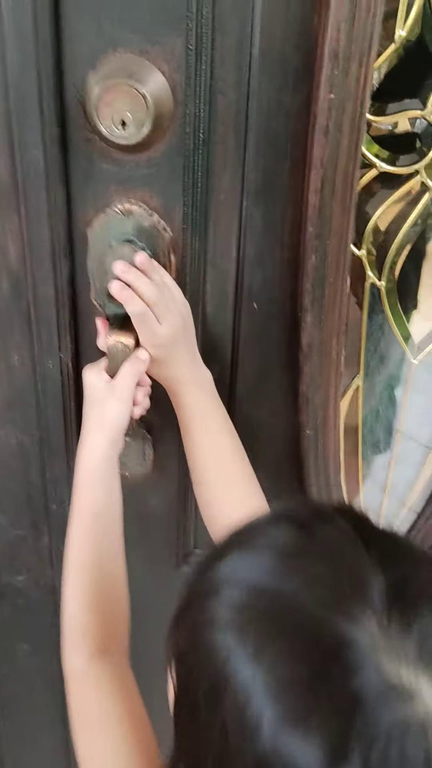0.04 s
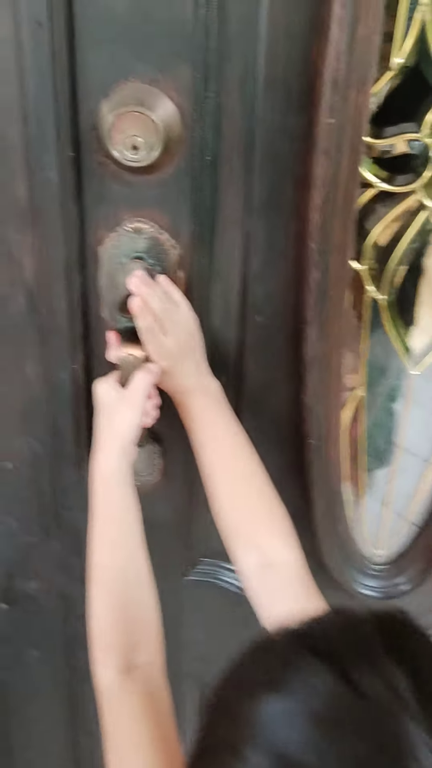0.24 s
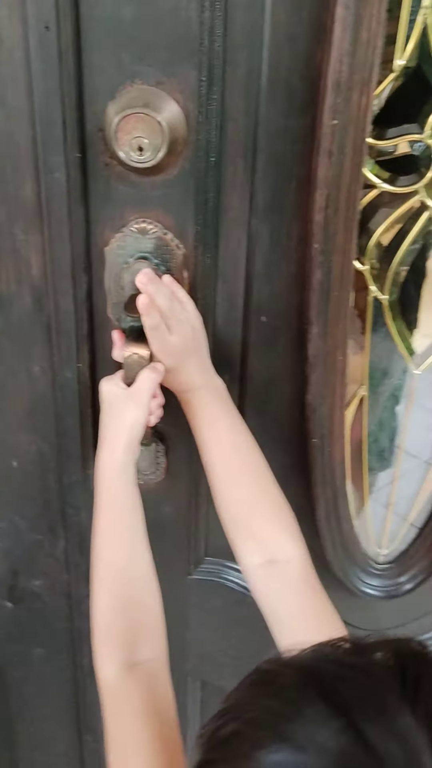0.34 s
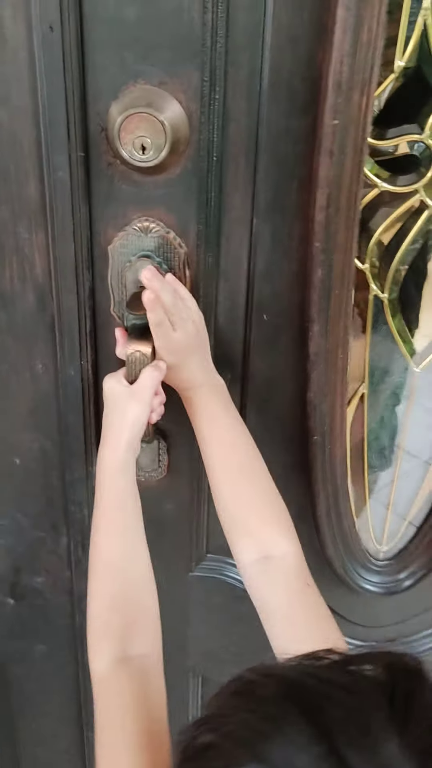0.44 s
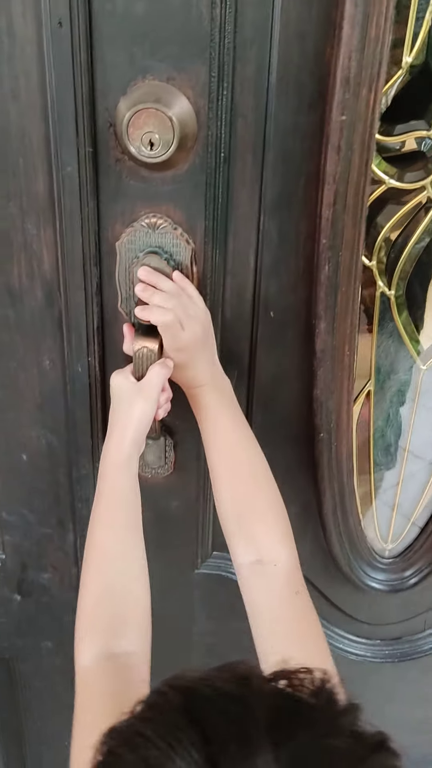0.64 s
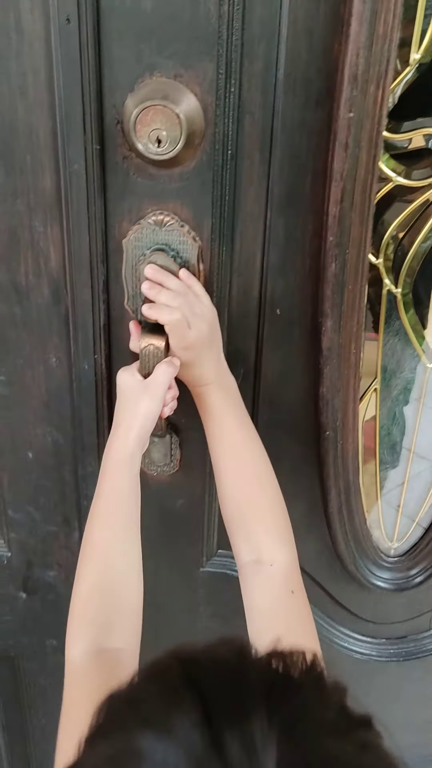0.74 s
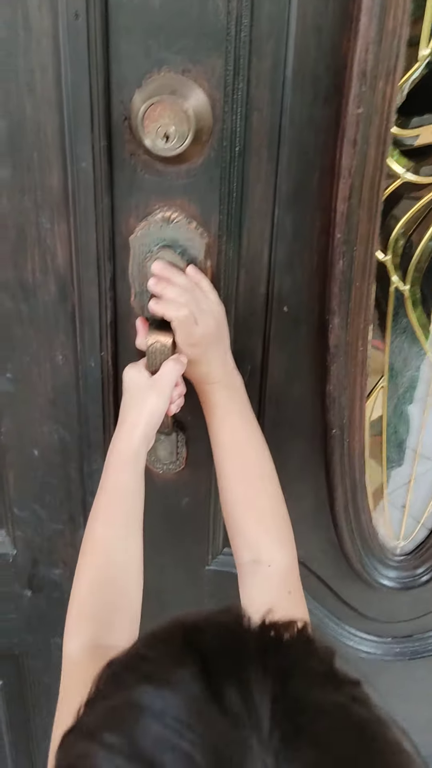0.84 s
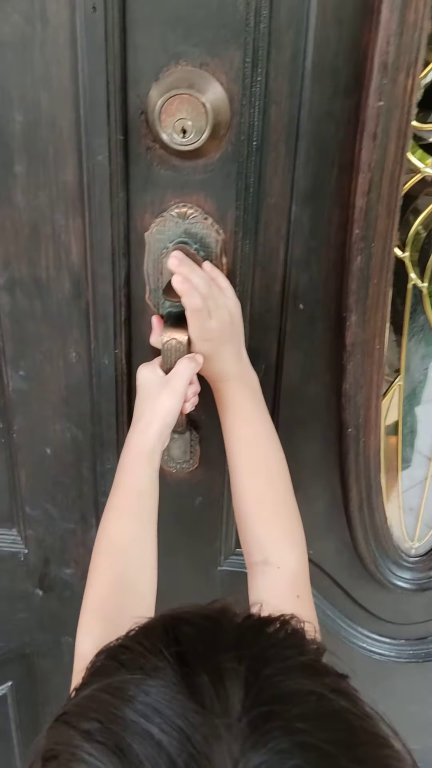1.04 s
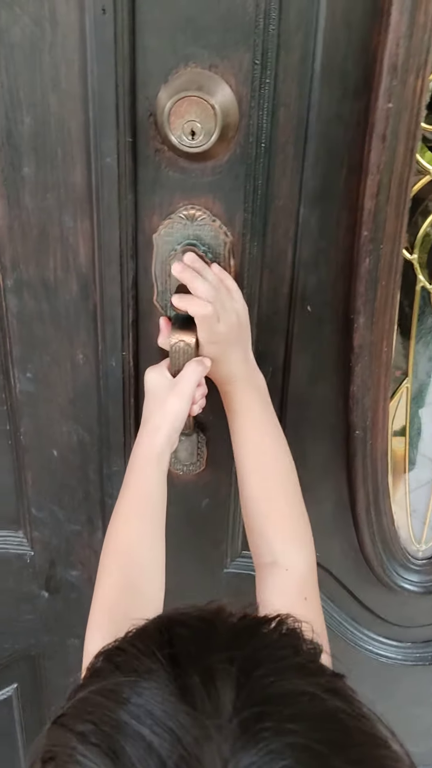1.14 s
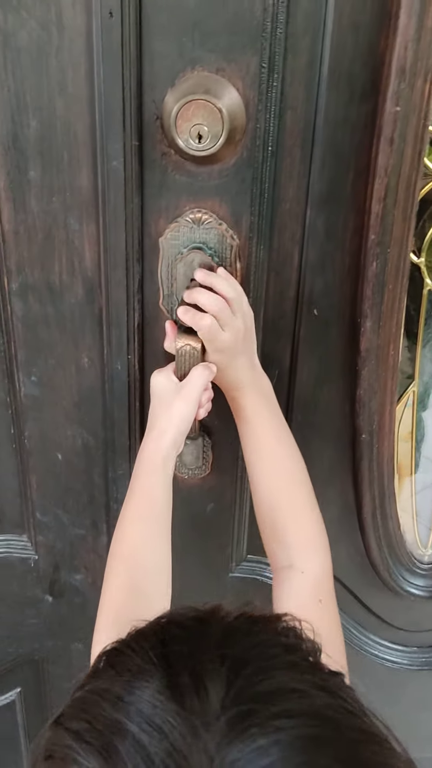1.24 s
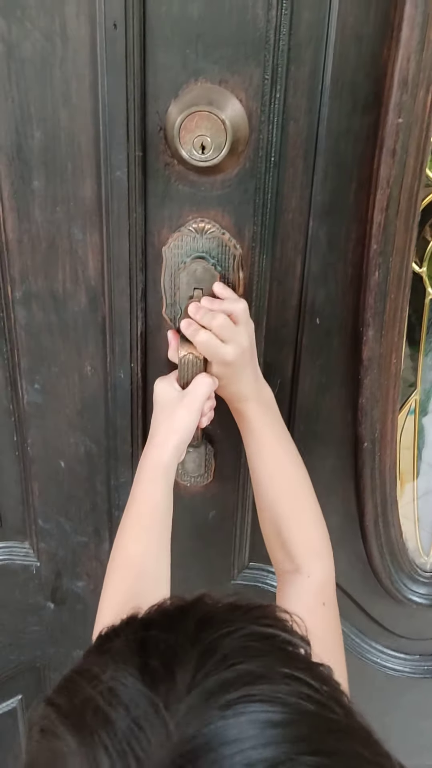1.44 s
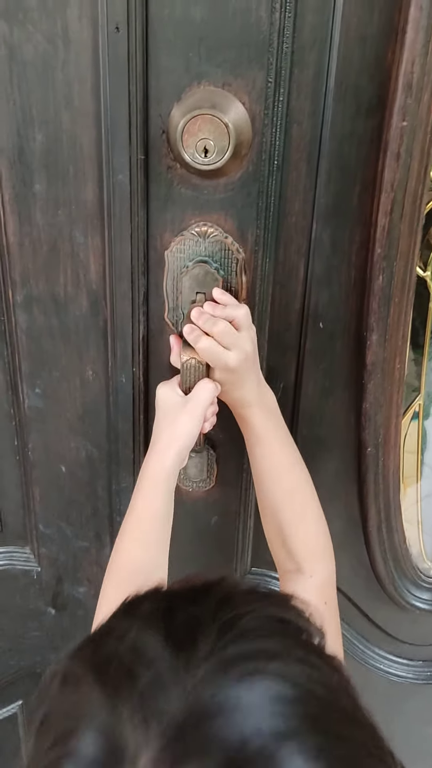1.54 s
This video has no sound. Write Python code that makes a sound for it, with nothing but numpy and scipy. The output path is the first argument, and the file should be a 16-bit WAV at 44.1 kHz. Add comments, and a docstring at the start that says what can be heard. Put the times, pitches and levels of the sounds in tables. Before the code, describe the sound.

Metal door latch clacking as a wooden door thuds, ending in one bright click.

```python
"""At a heavy wooden front door, close up: hands work the thumb latch.
The door thuds on its frame and its panel rings. Latch parts clack, scrape and ring the lock case.
After faint ticks and bumps the sprung bolt snaps home with one bright, bouncing click.
Behind it: low room rumble, a thin whistle and fine hiss."""
import sys
import numpy as np
from scipy import signal
from scipy.fft import rfft, irfft
from scipy.io import wavfile
from scipy.ndimage import uniform_filter1d

SR = 44100
rng = np.random.default_rng(int(sys.argv[2]) if len(sys.argv) > 2 else 0)


def pcm_store(signal):
    """Save signal as 16-bit PCM."""
    levels = np.round(np.clip(np.atleast_2d(signal), -1, 1) * 32767)
    wavfile.write(sys.argv[1], SR, levels.astype(np.int16).T)


N = 70560
T = np.arange(N) / SR
LEFT_LAG_S = 0.0004

# Latch clacks. Each row: start in seconds, bright level in dB, case level in dB, decay in seconds,
# left over right in dB.
LATCH_CLACKS = [(0.181, -42, -62, 0.0036, -7), (0.2081, -37, -24.5, 0.0081, 3),
                (0.2204, -14, -12, 0.0045, 4.5), (0.246, -17.5, -21.5, 0.011, 0),
                (0.256, -8, -18, 0.0038, 7), (0.2583, -7, -14.5, 0.0017, -3),
                (0.2666, -23, -19.5, 0.0051, -1), (0.294, -29, -25, 0.012, 18),
                (0.341, -21.5, -21.5, 0.017, 4), (0.351, -26, -31.5, 0.0064, -12),
                (0.354, -13, -22, 0.0092, 1.5), (0.4, -24, -28, 0.028, 1.5),
                (0.464, -19.5, -46, 0.0027, -6), (0.4649, -18.5, -30, 0.0052, -4),
                (0.51, -24.5, -26.5, 0.0081, -1.5), (0.521, -24, -30, 0.0022, 3),
                (0.565, -32, -33, 0.0068, 3), (0.6165, -22.5, -30.5, 0.0086, -3.5),
                (0.632, -36, -31, 0.0093, 13), (0.735, -28, -28, 0.0049, -9),
                (0.780, -49, -41.5, 0.025, -12), (0.831, -36.5, -36.5, 0.0049, -2)]
# Thumb piece ticks. Each row: start in seconds, level in dB.
THUMB_TICKS = [(0.948, -41), (0.961, -39), (0.967, -35.5), (0.991, -37.5), (1.038, -42.5), (1.206, -33.5),
               (1.211, -26), (1.218, -42), (1.244, -34)]
# Bolt landing and bounces. Each row: start in seconds, bright level in dB, case level in dB.
BOLT_HITS = [(1.4132, -31, -33), (1.4157, -7.5, -33), (1.4173, -9, -26.5), (1.4194, -6, -23),
             (1.4223, -13, -23.5), (1.4265, -17, -33.5)]
# Door on frame. Each row: centre in seconds, push in dB, Gaussian width in seconds, sign.
FRAME_PUSHES = [(0.2251, -15, 0.00062, -1), (0.2322, -11, 0.00088, 1), (0.2364, -4.5, 0.00043, -1),
                (0.2415, -7, 0.00079, 1), (0.2441, -13, .001, -1)]
# Hand bumps and door knocks. Each row: start in seconds, level in dB, decay in seconds.
HAND_BUMPS = [(0.434, -24.5, 0.035), (0.520, -25.5, 0.0088), (1.150, -33.5, 0.019), (1.171, -38.5, 0.044),
              (1.267, -34, 0.022), (1.302, -33, 0.012), (1.413, -49, 0.065)]
DOOR_KNOCKS = [(0.306, -26.5, 0.02), (0.356, -35, 0.0081), (0.508, -42, 0.005), (0.523, -21.5, 0.0064)]

# Ringing modes. Each row: frequency in Hz, relative level in dB, T60 in seconds.
LOCK_CASE_MODES = [(965, -28.5, 0.12), (1926, -21, 0.1), (2670, -17, 0.13), (3077, -5, 0.023),
                   (3240, -18.5, 0.023), (3830, -21, 0.043), (4526, -13, 0.084), (5812, -17, 0.073)]
BOLT_MODES = [(1012, -50, 0.35), (1209, -21, 0.058), (1373, -33, 0.055), (1680, -23.5, 0.041),
              (2060, -43, 0.063), (3200, -32, 0.063), (7843, -36, .04), (8300, -38, .04),
              (9350, -44, 0.035), (8960, -25, 0.035), (9100, -31, 0.033), (10200, -44, 0.041),
              (10665, -45, .045)]
DOOR_MODES = [(104.6, -32, 0.72), (179.9, -25.5, 0.66), (211, -35, .25), (285.4, -35, 0.78),
              (353.3, -23, 0.22), (438, -34.5, 1.0), (465, -26.5, 0.27), (570, -35, 0.39)]
# Shaken panel resonances. Each row: frequency in Hz, gain in dB, width in Hz.
PANEL_RESONANCES = [(106.4, -9, 36), (315.3, -10, 15.5), (378, -21.5, 6.7), (428, -9, 22.5)]

# Shaking. Each row: time in seconds, wood drive in dB, case drive in dB.
SHAKE_LEVELS = [(0, -43, -50), (.09, -53, -58), (.205, -47, -54), (.245, -27, -25.5), (.32, -37.5, -38.5),
                (.39, -33.5, -34), (.53, -37.5, -35.5), (.595, -40, -43.5), (.67, -42.5, -49),
                (.725, -43, -34), (.77, -47, -71), (.85, -51, -51), (.92, -54.5, -64.5),
                (1.18, -59.5, -68.5), (1.24, -58.5, -51.5), (1.38, -54, -79), (1.6, -57.5, -69)]
# Sliding metal. Each row: time in seconds, scrape level in dB, fizz level in dB.
SLIDE_LEVELS = [(0, -37, -39), (.035, -39.5, -53), (.10, -51.5, -72), (.21, -46.5, -73), (.26, -19, -53),
                (.325, -72, -60), (.42, -39.5, -64), (.53, -35.5, -47), (.605, -55, -52), (.64, -38.5, -37),
                (.665, -34, -40.5), (.73, -30.5, -34), (.77, -64, -59), (.87, -57, -59), (1.24, -56.5, -52),
                (1.6, -63, -82)]
# Thin whistle. Each row: time in seconds, level in dB.
WHISTLE_LEVELS = [(0, -75), (.98, -74), (1.12, -57), (1.2, -62), (1.28, -54), (1.40, -86), (1.6, -80)]
# Drifting hiss band. Each row: time in seconds, centre in Hz, level in dB.
HISS_TRACK = [(.75, 10000, -75), (.85, 11270, -57), (0.899, 11750, -55), (.98, 12300, -60),
              (1.2, 12400, -61), (1.312, 11900, -58.5), (1.40, 10030, -58), (1.482, 9110, -52.5),
              (1.58, 7540, -68.5)]

# Source spectra. Each row: frequency in Hz, relative density in dB.
CLACK_SPECTRUM = [(300, -39), (5000, -10.5), (6800, -8), (7700, 1.5), (8600, 7.5), (10200, -2.5),
                  (11800, -14.5), (14500, -36)]
CASE_SPECTRUM = [(100, -14), (450, -3.5), (1300, -5), (2100, -2), (2600, -3.5), (3080, -4), (3400, 1),
                 (3800, 0.5), (4900, -15), (5800, -6), (7500, -11.5), (14000, -40)]
SNAP_SPECTRUM = [(300, -50), (5000, -13.5), (7200, -14), (8000, -4.5), (9100, 1), (10000, -1.5),
                 (11000, -2), (11800, -9.5), (14000, -13)]
SNAP_CASE_SPECTRUM = [(100, -34), (260, -11), (520, -16), (850, -1), (1250, -2), (2000, -5.5), (2700, -3.5),
                      (3300, -0.5), (4800, -4), (7000, -18), (14000, -35)]
WOOD_SPECTRUM = [(20, -7.5), (55, -6.5), (80, -7.5), (105, 1), (135, -6), (175, -2.5), (240, -13.5),
                 (290, -2.5), (390, -26.5), (440, -11.5), (700, -19), (2000, -32)]
SCRAPE_SPECTRUM = [(300, -53), (4000, -15.5), (6500, -6.5), (8800, 0.5), (10200, 0), (12000, -14),
                   (14500, -13.5)]
FIZZ_SPECTRUM = [(300, -44), (8000, -14), (10500, 6), (12500, -5), (14200, -6)]
PALM_SPECTRUM = [(20, 0.5), (60, -0.5), (130, -2), (210, -11.5), (330, -29.5), (1000, -65)]
KNOCK_SPECTRUM = [(40, -24), (150, 6), (260, 6), (350, 8), (400, -18), (450, -13), (590, 1), (800, -18),
                  (2500, -25)]
RUMBLE_SPECTRUM = [(20, 3.5), (60, 4.5), (120, -2), (200, -14.5), (400, -15), (800, -15.5), (2000, -20),
                   (4500, -48.5), (14000, -66)]
HISS_SPECTRUM = [(3000, -21), (6000, -12), (8000, -16), (9400, 4.5), (10500, -17), (12000, -5),
                 (14000, -13)]

# Room decay. Each row: frequency in Hz, T60 in seconds.
ROOM_DECAY = [(100, 0.58), (500, 0.38), (2000, 0.31), (9000, 0.3), (14000, 0.35)]
# Microphone mismatch. Each row: frequency in Hz, left over right in dB before normalising.
MIC_BALANCE = [(30, -11), (100, -1), (350, 1.5), (700, 0.5), (1250, -2.5), (2300, -1.5), (4300, 1.5),
               (6000, -1.5), (7800, -6), (9500, -13), (11000, 6.5), (13500, 0.5)]


def latch(tick_decay_s=0.0039, tick_case_db=-15.5, tick_pan_db=-0.5):
    """Each clack or tick is a short chatter that rings small parts and the lock case."""
    ticks = [(s, db, db + tick_case_db, tick_decay_s, tick_pan_db) for s, db in THUMB_TICKS]
    hits = LATCH_CLACKS + ticks
    bright_env = sum(amp(db) * burst(s, decay_s) * pan(pan_db) for s, db, _, decay_s, pan_db in hits)
    case_env = sum(amp(db) * burst(s, decay_s) for s, _, db, decay_s, _ in hits)
    case = lock_case(case_env * grit(grain_db=2, shared=0.39))
    bright = colour(bright_env * grit(grain_db=0.5, shared=0.39), CLACK_SPECTRUM)
    return room(bright + case * pan(db=4), wet_db=-9)


def lock_case(contacts):
    """The metal case gives contacts a broad colour and narrow resonances."""
    rings = sum(amp(db) * resonance(contacts, hz, width_hz=np.log(1000) / np.pi / t60_s)
                for hz, db, t60_s in LOCK_CASE_MODES)
    return amp(-1) * colour(contacts, CASE_SPECTRUM) + amp(-5) * rings


def bolt_snap(lag_s=0.000136):
    """The sprung bolt lands, bounces and rings."""
    bright_env = sum(amp(db) * burst(s, decay_s=0.0015, rise_s=0.0001) for s, db, _ in BOLT_HITS)
    case_env = sum(amp(db) * burst(s, decay_s=0.0037) for s, _, db in BOLT_HITS)
    bright = colour(bright_env * grit(grain_db=1.5, shared=0.61, lag_s=lag_s), SNAP_SPECTRUM)
    case = colour(case_env * grit(grain_db=1.5, shared=0.24, lag_s=lag_s), SNAP_CASE_SPECTRUM)
    bolt = mic_pair(ring(BOLT_MODES, start_s=1.4197), lag_s)
    return room((bright + case + bolt) * pan(db=0.5), wet_db=-12.5)


def door_thud(highpass_hz=30.4):
    """The door pushes on its frame in a few pulses; the panel rings."""
    push = sum(sign * amp(db) * np.exp(-0.5 * ((T - s) / width_s) ** 2)
               for s, db, width_s, sign in FRAME_PUSHES)
    push = signal.lfilter(*signal.butter(1, highpass_hz, "high", fs=SR), push)
    panel = ring(DOOR_MODES, start_s=0.237)
    return room(mic_pair(push + panel, LEFT_LAG_S), wet_db=-25)


def door_shake():
    """Wood rumbles and hums under the hands; loose lock parts rattle."""
    drive = level(SHAKE_LEVELS, column=1) * grit(grain_db=3.5, shared=0.93)
    hum = sum(amp(db) * resonance(drive, hz, width_hz) for hz, db, width_hz in PANEL_RESONANCES)
    rattle = lock_case(level(SHAKE_LEVELS, column=2) * grit(grain_db=2.5, shared=0.44))
    return colour(drive, WOOD_SPECTRUM) + hum + room(rattle, wet_db=-8.5)


def metal_slide():
    """Metal scrapes on metal, with finer fizz on quick strokes."""
    scrape = colour(level(SLIDE_LEVELS, column=1) * grit(grain_db=1.5, shared=0.43), SCRAPE_SPECTRUM)
    fizz = colour(level(SLIDE_LEVELS, column=2) * grit(grain_db=1.5, shared=0.23), FIZZ_SPECTRUM)
    return room((scrape + fizz) * pan(db=4), wet_db=-5)


def hand_bumps():
    """Soft hands bump dully on the wood."""
    return colour(soft_bursts(HAND_BUMPS) * grit(grain_db=4, shared=0.6), PALM_SPECTRUM)


def door_knocks():
    """The door knocks hollowly as the latch shifts."""
    return colour(soft_bursts(DOOR_KNOCKS) * grit(grain_db=0, shared=0.83), KNOCK_SPECTRUM) * pan(db=1)


def whistle(centre_hz=5256, stage_width_hz=47):
    """Faint thin whistle: noise through two narrow resonances in series."""
    noise = rng.standard_normal((2, N))
    for _ in range(2):
        noise = resonance(noise, centre_hz, stage_width_hz)
    return level(WHISTLE_LEVELS) * unit(noise)


def room_rumble():
    """Steady low room noise."""
    return amp(-50.5) * colour(grit(grain_db=2, shared=0.64), RUMBLE_SPECTRUM) * pan(db=1)


def drifting_hiss(width_hz=1400):
    """A faint noise band rises in pitch, then sinks."""
    times_s, centres_hz, _ = np.transpose(HISS_TRACK)
    carrier = np.exp(2j * np.pi * np.cumsum(np.interp(T, times_s, centres_hz)) / SR)
    noise = rng.standard_normal((2, N)) + 1j * rng.standard_normal((2, N))
    baseband = signal.lfilter(*signal.butter(2, width_hz / 2, fs=SR), noise)
    return level(HISS_TRACK, column=2) * unit((baseband * carrier).real) * pan(db=-14)


def steady_hiss():
    """Fine grainy hiss, mostly right."""
    return amp(-61.5) * colour(grit(grain_db=5, shared=0.1), HISS_SPECTRUM) * pan(db=-15.5)


def room(x, wet_db, onset_s=0.0027):
    """Adds a diffuse tail; bass lasts longest."""
    hz, t, noise = signal.stft(rng.standard_normal((2, SR)), SR, nperseg=256)
    decay = amp(-60 * t / at_hz(ROOM_DECAY, hz)[:, None])
    tail = signal.istft(noise * decay * np.minimum(t / onset_s, 1), SR, nperseg=256)[1]
    return x + amp(wet_db) * signal.fftconvolve(x, tail / np.linalg.norm(tail[0]), axes=1)[:, :N]


def grit(grain_db, shared, lag_s=LEFT_LAG_S):
    """Dense tiny contacts: sizes spread by grain_db, a shared power fraction in both channels."""
    common, left, right, spread = rng.standard_normal((4, N))
    size = amp(grain_db * unit(uniform_filter1d(spread, 40)))
    alike = np.sqrt(shared) * mic_pair(common * size, lag_s)
    apart = np.sqrt(1 - shared) * np.array([left, right]) * size
    return unit(alike + apart)


def burst(start_s, decay_s, rise_s=0.00026):
    """Quick attack, exponential release."""
    t = np.maximum(T - start_s, 0)
    return (1 - np.exp(-t / rise_s)) * np.exp(-t / decay_s)


def soft_bursts(hits):
    return sum(amp(db) * burst(s, decay_s, rise_s=0.0014) for s, db, decay_s in hits)


def ring(modes, start_s):
    """Decaying modes struck together."""
    t = np.maximum(T - start_s, 0)
    return sum(amp(db - 60 * t / t60_s) * np.sin(2 * np.pi * hz * t) for hz, db, t60_s in modes)


def resonance(x, hz, width_hz):
    """One driven mode."""
    return unit_energy_filter(x, np.exp(-np.pi * width_hz * T) * np.sin(2 * np.pi * hz * T))


def colour(x, spectrum):
    """Minimum-phase filter shaped to the spectrum."""
    log_gain = np.log(amp(at_hz(spectrum, abs(np.fft.fftfreq(4096, 1 / SR)))))
    response = np.exp(np.conj(signal.hilbert(log_gain)))
    return unit_energy_filter(x, np.fft.ifft(response).real[:2048])


def unit_energy_filter(x, taps):
    return signal.fftconvolve(x, taps[None] / np.linalg.norm(taps), axes=1)[:, :N]


def mic_pair(x, lag_s):
    """Sound reaches the right microphone first."""
    return np.array([np.interp(T - lag_s, T, x), x])


def pan(db):
    """Stereo gains; positive is left."""
    return amp(np.array([[db / 2], [-db / 2]]))


def level(curve, column=1):
    """Gain over time from a dB column."""
    rows = np.array(curve)
    return amp(np.interp(T, rows[:, 0], rows[:, column]))


def at_hz(curve, hz):
    knots_hz, values = np.transpose(curve)
    return np.interp(np.log(hz + 1), np.log(knots_hz + 1), values)


def amp(db):
    return 10 ** (np.asarray(db) / 20)


def unit(x):
    return x / np.sqrt(np.mean(x ** 2) + 1e-20)


def scene():
    """Latch and door over the background, in stereo."""
    door = latch() + bolt_snap() + door_thud() + door_shake() + metal_slide()
    door += hand_bumps() + door_knocks()
    return door + whistle() + room_rumble() + drifting_hiss() + steady_hiss()


def record(dry):
    """Two microphones of unequal colour, peak clipping, then a low-pass."""
    balance_db = at_hz(MIC_BALANCE, np.fft.rfftfreq(2 * N, 1 / SR))
    gains = amp(np.array([balance_db, -balance_db]) / 2)
    gains /= np.sqrt(np.mean(gains ** 2, axis=0))
    heard = irfft(rfft(dry, 2 * N) * gains)[:, :N]
    clipped = np.clip(heard, -0.88, 0.88)
    lowpass = signal.firwin(401, cutoff=14350, window=("kaiser", 8), fs=SR)
    return signal.oaconvolve(clipped, lowpass[None], "same")


dry = scene()
out = record(dry)
pcm_store(out)
```